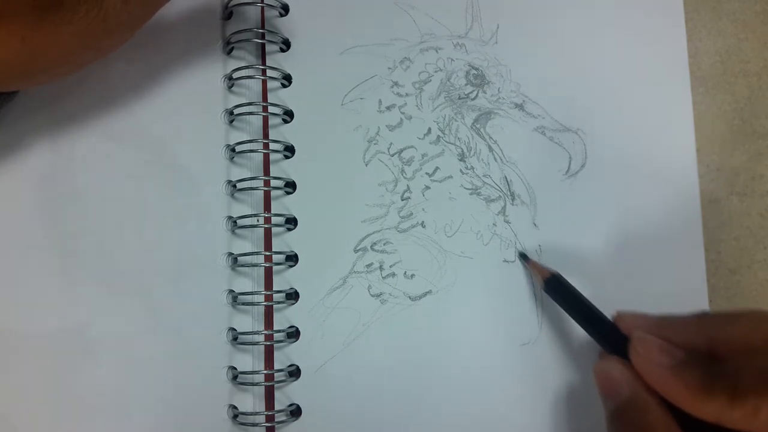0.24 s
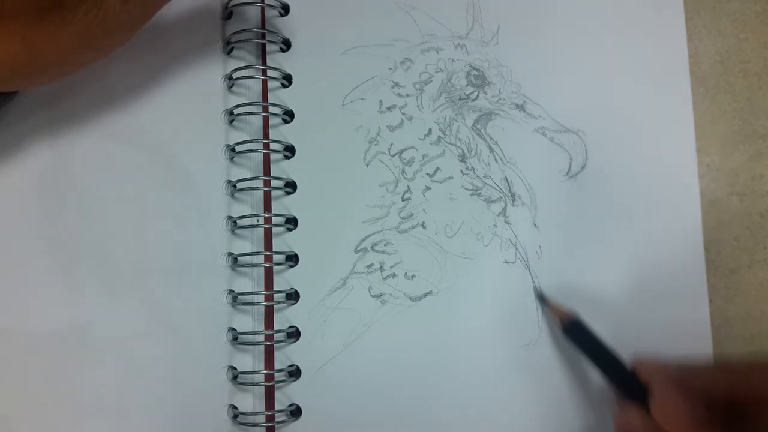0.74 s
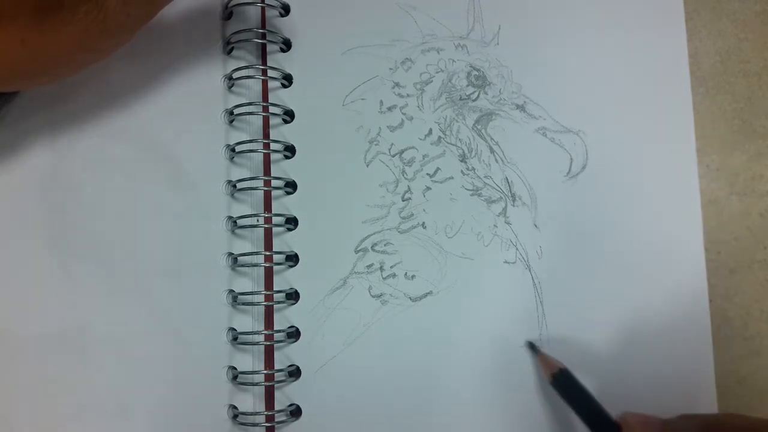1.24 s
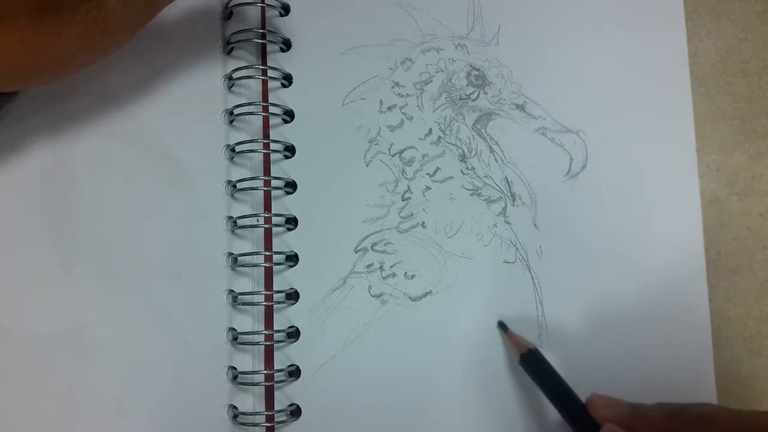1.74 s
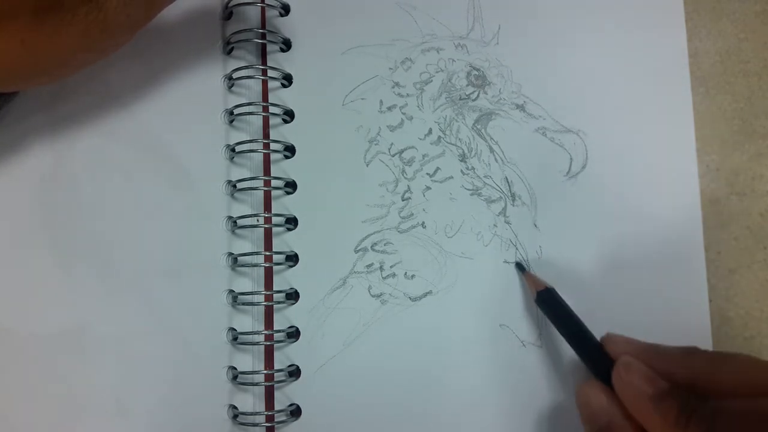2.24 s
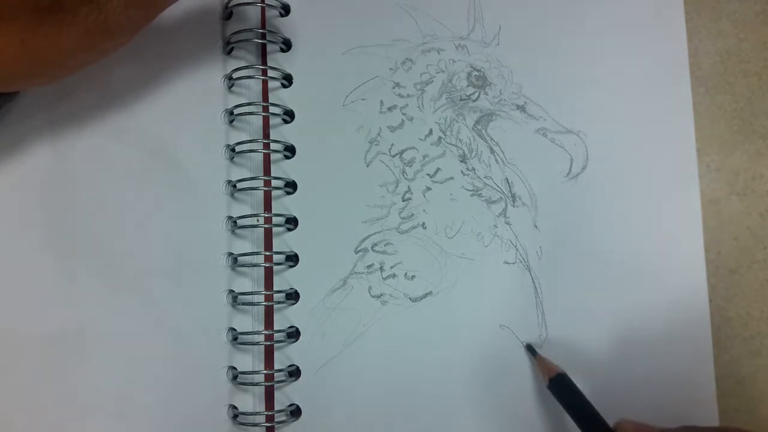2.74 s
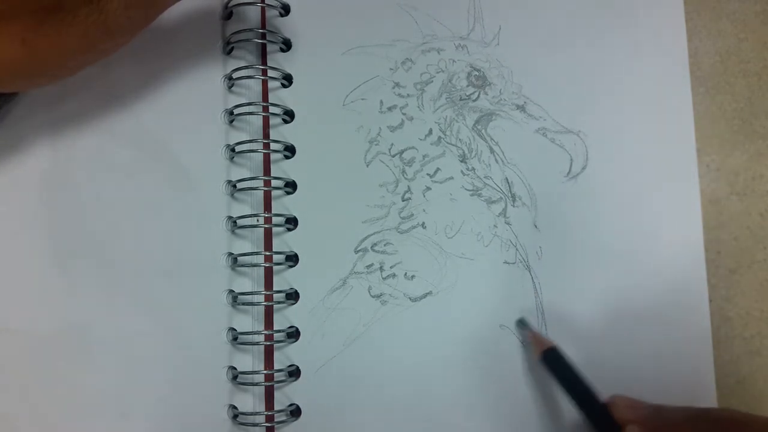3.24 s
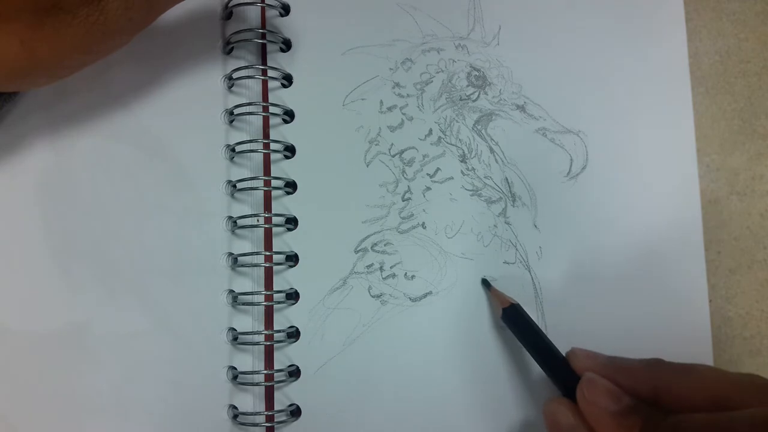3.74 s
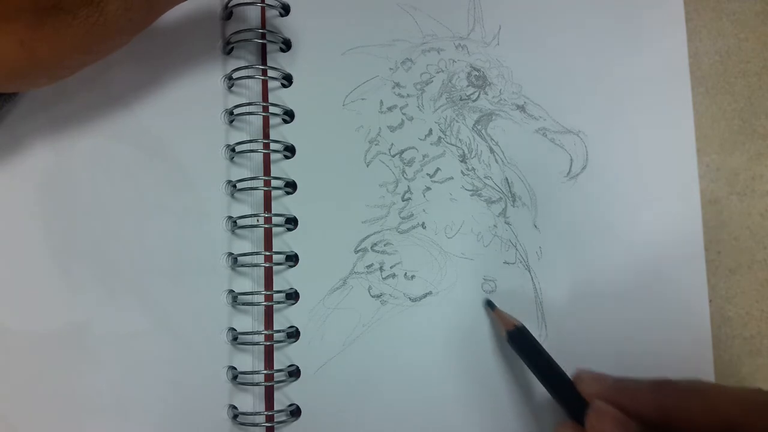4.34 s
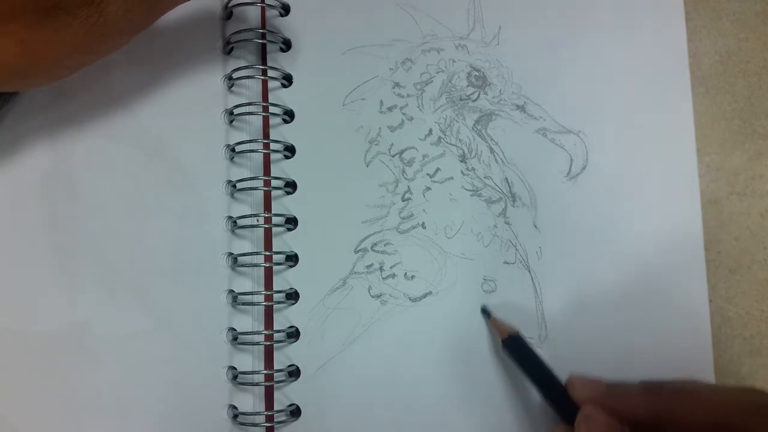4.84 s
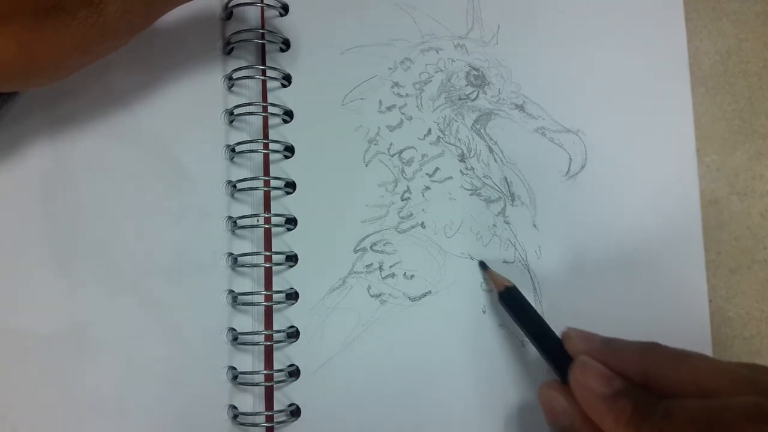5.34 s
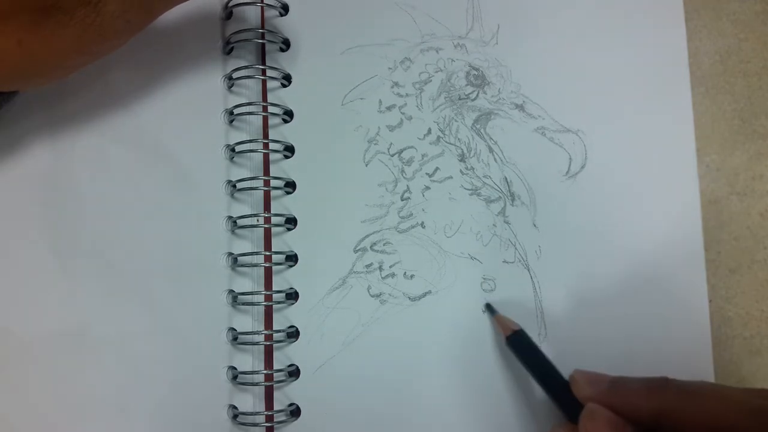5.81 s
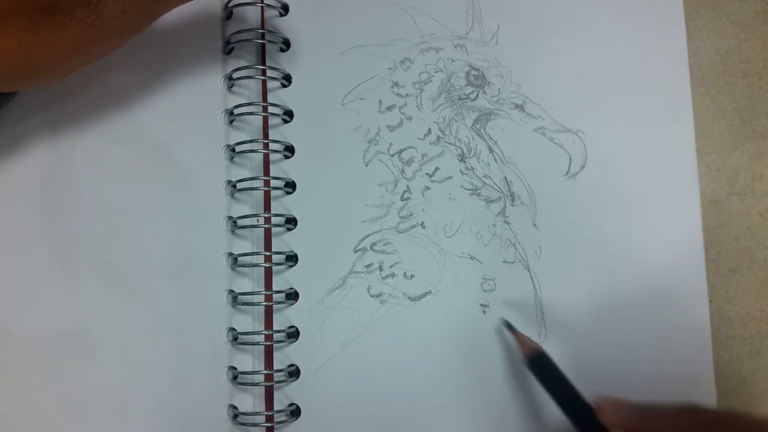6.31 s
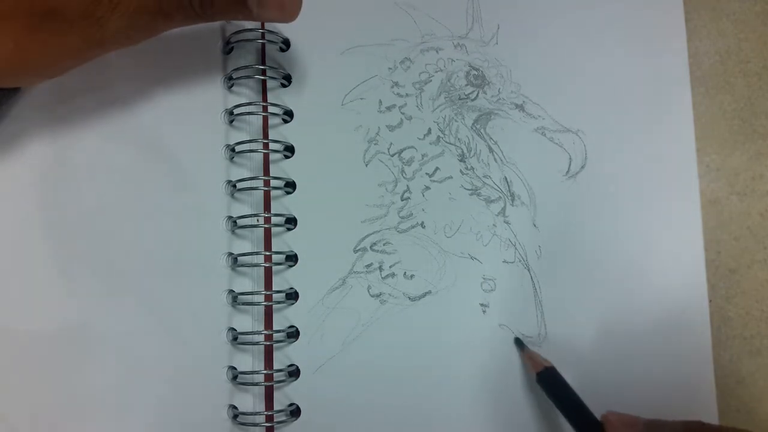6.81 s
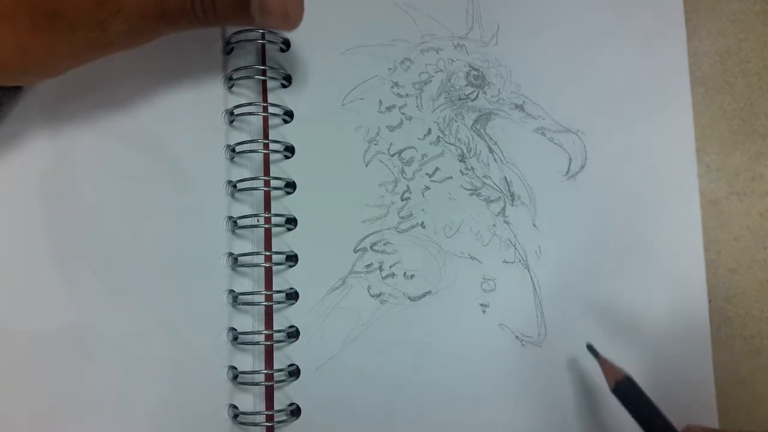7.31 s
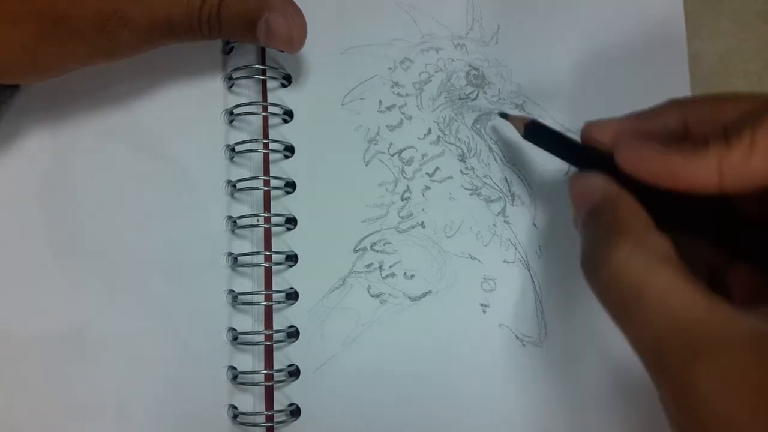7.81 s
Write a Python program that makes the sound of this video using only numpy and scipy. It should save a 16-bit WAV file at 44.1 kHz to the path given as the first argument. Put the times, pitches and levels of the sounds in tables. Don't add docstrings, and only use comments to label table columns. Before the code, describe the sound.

A pencil drags dry, gritty strokes over a spiral pad, the page rumbling dully under the tip. Separate lines give way to fast, light shading dabs, then a brief lull and a few more marks with tiny clicks. The hand slides away with a papery rustle at the end. A motor hums gently with airflow throughout. Close, quiet mono phone pickup indoors, with a very short room tail.

```python
import sys
import numpy as np
from scipy import signal
from scipy.fft import rfft, irfft
from scipy.io import wavfile
from scipy.ndimage import uniform_filter1d

SR = 44100
rng = np.random.default_rng(int(sys.argv[2]) if len(sys.argv) > 2 else 0)


def gain_from_db(level_db):
    decades = np.asarray(level_db, float) / 20
    return 10 ** decades


def pcm_store(signal):
    levels = np.round(np.clip(np.atleast_2d(signal), -1, 1) * 32767)
    wavfile.write(sys.argv[1], SR, levels.astype(np.int16).T)


N = 355840
T = np.arange(N) / SR

# start, fastest moment and end in seconds, hiss in dB, squareness of the speed arch.
DRAWN_LINES = [(-0.005, 0.004, 0.036, -70.9, 2.5), (0.033, 0.109, 0.185, -70.4, 1.6),
               (0.27, 0.367, 0.425, -64.5, 2.3), (0.428, 0.525, 0.626, -68.1, 2.3),
               (0.694, 0.899, 1.008, -49.8, 2.7), (1.036, 1.1, 1.185, -67.5, 2.6),
               (1.172, 1.237, 1.285, -65.5, 3.0), (1.286, 1.349, 1.415, -61.5, 2.4),
               (1.415, 1.444, 1.509, -69.9, 5.6), (1.527, 1.608, 1.691, -58.8, 3.0),
               (1.697, 1.725, 1.783, -69, 5.3), (2.077, 2.144, 2.205, -69.5, 2.1),
               (2.168, 2.185, 2.389, -67.9, 3.5), (2.432, 2.7, 2.84, -59.5, 4),
               (2.52, 2.65, 2.78, -55.3, 1.9), (2.989, 3.026, 3.092, -61.6, 2.2),
               (3.086, 3.139, 3.189, -69.4, 4.6), (3.196, 3.249, 3.312, -60.4, 2.9),
               (3.914, 4.0, 4.059, -64.6, 6), (4.003, 4.108, 4.25, -59.6, 1.4),
               (4.182, 4.246, 4.303, -63.6, 3.9), (4.289, 4.337, 4.389, -63.3, 1.3),
               (6.363, 6.486, 6.563, -65.9, 1.8), (7.94, 8.047, 8.128, -71.7, 1.8)]
# start and end in seconds, hiss in dB.
SHADING_DABS = [(1.79, 1.838, -75), (3.59, 3.613, -69), (3.61, 3.727, -70), (3.753, 3.873, -64.5),
                (4.548, 4.595, -72), (4.612, 4.71, -69), (4.72, 4.783, -68.5), (4.806, 4.883, -73),
                (4.902, 4.987, -71.5), (4.993, 5.118, -69.5), (5.095, 5.13, -67.5), (5.137, 5.222, -68.5),
                (5.23, 5.317, -66.5), (5.331, 5.443, -62), (5.446, 5.527, -63.5), (5.527, 5.595, -70),
                (5.571, 5.704, -74), (5.825, 5.925, -72.9), (5.916, 5.996, -64.5), (6.012, 6.094, -66.5),
                (6.102, 6.176, -63.9), (6.182, 6.262, -70), (6.598, 6.7, -75), (6.68, 6.76, -83),
                (6.92, 7.002, -71), (7.022, 7.095, -63.2), (7.112, 7.161, -73.1), (7.178, 7.206, -69.6),
                (7.218, 7.244, -72), (7.245, 7.277, -73)]
# start in seconds, slant (0 upright, 1 leaning, 2 slanted),
# stretch of the rings as a ratio, brightness in dB per octave, squeak in dB.
GRIPS_ON_SHEET = [(0, .1, .96, -3, -13), (.25, .15, .99, -3, -14), (.65, 0, 1.0, 4, -19),
                  (1.04, .7, 1.02, -.3, -13), (1.28, .3, 1.025, -4, -17), (1.51, .1, 1.001, 3, -14),
                  (1.9, .9, .99, -.3, -12), (2.4, .05, .99, -1.2, -21), (2.9, .55, 1.02, 1.5, -19),
                  (3.4, .5, 1.035, 1.5, -6), (3.9, .1, 1.02, 2.5, -11), (4.45, 1.05, 1.01, -.3, -19),
                  (4.98, .9, .9, -7, -15), (5.1, 1.05, .995, .3, -16), (5.58, 1.7, 1.02, -7, -13),
                  (5.75, 2, .95, 4, -12.5), (6.3, 1.9, 1.03, -6.5, -17), (6.6, 1.9, 1.001, 3, -16),
                  (6.85, 1.95, .995, .3, -14), (7.9, .3, .94, -7, -15)]
# centre in Hz, width in Hz, level in dB.
UPRIGHT_RINGS = [(6400, 3300, -13.5), (9400, 2200, -1), (11000, 1500, -11), (12800, 3400, -4),
                 (14300, 2300, -13), (15600, 2000, -23)]
LEANING_RINGS = [(5900, 2400, -14), (9350, 2100, -1.5), (11400, 2300, -8), (12800, 2000, -14),
                 (14200, 2400, -5.5), (15700, 1800, -17)]
SLANTED_RINGS = [(6500, 2400, -14), (8900, 1900, -3.5), (11300, 2100, -1.5), (12600, 1500, -16),
                 (13900, 2100, -1.5), (15600, 1300, -22)]
# frequency in Hz, level in dB.
PAGE_COLOUR = [(500, 7), (800, 24.5), (1600, 15), (2300, 8.5), (3700, 2), (5000, -10.5), (7000, -25)]
# frequency in Hz, level in dB.
PAD_COLOUR = [(600, -5), (800, 6.5), (1100, -8), (1550, -3.5), (2100, -26)]
# time in seconds, level against the hiss in dB.
PAD_DRUMMING = [(0, -4), (.9, -8.5), (1.35, 5.5), (1.6, 3.5), (2.7, -7.5), (3.1, -1), (3.8, 10), (4.1, 6),
                (4.4, -4), (5.4, 2), (6.0, 6.5), (7.1, -12)]
# frequency in Hz, level in dB.
RUSTLE_COLOUR = [(4000, 4), (5000, 3), (6400, 0.5), (7800, 4.5), (9600, 3), (12000, 2), (14200, 2),
                 (15000, -3), (15700, -6)]
# frequency in Hz, level in dB.
RUB_COLOUR = [(1200, 12.5), (2200, 6.5), (3000, -2), (3800, -0.5), (4600, -9.5), (7000, -10.5)]
# middle in seconds, length in seconds, added rustle and rub in dB.
HAND_SLIDES = [(1.4, 1.7, 0.5, 2.5), (2.4, 0.64, 2, 1.5), (3.05, 1.2, 2.5, 0.5), (3.7, 1.2, 1, 2),
               (4.35, .4, 3, -3.5), (5.106, 0.37, 2, 4.5), (6.2, .4, 2, 1), (6.447, 0.33, .1, 9),
               (6.64, 0.46, 2.5, 5.5), (6.87, 0.54, 2.5, 4.5), (7.437, .22, 3.5, 4.5), (7.6, 0.35, 2, 6),
               (7.833, 0.42, 6.5, 8.5), (8.08, 0.37, 4, 8)]
# frequency in Hz, density in dB per Hz.
AIR_COLOUR = [(18, -18), (53, -2.5), (86, -6), (124, 1.5), (204, -8.5), (265, -4), (329, -9.5), (408, -16),
              (460, -14.5), (835, -12.5), (1250, -23.5), (1700, -28), (2100, -37.5), (3200, -52)]
# centre in Hz, width in Hz, level in
# dB.
DUCT_AND_ROOM_RINGS = [(153.7, 20.6, -65), (235.3, 12, -59), (298.7, 10.9, -56), (565.3, 12.2, -59.5),
                       (465, 29, -68), (658, 30, -75.5), (732.4, 35, -65), (821, 80, -65.5), (875, 92, -64.5),
                       (1024.4, 70, -66), (1121.5, 36, -68.5), (1508, 166, -71.5)]
# centre in Hz, width in Hz, level in dB.
ELECTRONIC_WHINES = [(10900, 30, -94), (12200, 60, -97), (14200, 200, -90), (4000, 120, -94)]
# frequency in Hz, rms level in dB, wavering in dB.
MOTOR_TONES = [(29.78, -67, .3), (30.11, -66, .3), (90.1, -68, 2), (119.95, -62, 2), (180.3, -61, 1),
               (328.6, -67, 2), (537.5, -64, 1.5), (597.2, -57, 1), (1194.6, -71, 1)]
# time in seconds, low tone in dB, blade tone in dB.
ROOM_SWELL = [(0, -52, -47), (.4, -54, -47.5), (.8, -48.5, -51.5), (1.15, -56, -53.5), (1.65, -50, -44.5),
              (1.95, -54, -49.5), (2.45, -56, -55.5), (3.1, -55, -49), (3.6, -55, -50.5),
              (4.05, -58, -44.5), (4.45, -49, -50.5), (5.1, -58, -50), (5.6, -59, -51), (6.1, -51, -46.5),
              (6.45, -63, -47), (7.1, -58, -47), (7.45, -47.5, -51.5), (8.07, -50.5, -47.5)]
# start in seconds, peak in dB, pitch in Hz.
KNOCKS = [(1.934, -56, 2000), (3.589, -58, 6000), (5.101, -53, 2800), (6.8352, -42, 2300),
          (6.8355, -58, 5000), (6.871, -53, 3700), (6.907, -51, 3900), (6.9825, -48, 3600),
          (7.394, -53, 3200), (7.457, -56, 6700), (7.5875, -53, 8300), (7.844, -58, 8000),
          (7.986, -55, 12800), (7.986, -58, 9000)]

DAB_FASTEST, DAB_SQUARE = 0.49, 3.3
PAGE_REL_DB, PAGE_FOLLOWS = -11.8, 0.65
SQUEAK_HZ, SQUEAK_WIDTH_HZ = 7060, 600
RIPPLE_DB, RIPPLE_BINS = 1.4, 5
REST_RUSTLE_DB, REST_RUB_DB = -81.5, -78
AIR_LEVEL_DB = -45
LOW_HZ, BLADE_HZ = 59.72, 298.6
SWELL_TRIM_DB, FLICKER_DB = -2.4, 2.6


def evened(x):
    return x / np.sqrt(np.mean(x ** 2) + 1e-20)


def shaped(x, points):
    f, level_db = np.transpose(points)
    hz = np.fft.rfftfreq(N, 1 / SR)
    gain_db = np.interp(np.log(hz + 1), np.log(f + 1), level_db, -60, -60)
    return irfft(rfft(x) * gain_from_db(gain_db), N)


def band_rms(x, lo_hz, hi_hz):
    return np.sqrt(np.mean(shaped(x, [(lo_hz, 0), (hi_hz, 0)]) ** 2))


def wander(rate):
    knots = rng.standard_normal(int(N / SR * 400) + 2)
    smooth = evened(uniform_filter1d(knots, max(1, round(400 / rate))))
    return np.interp(T * 400, np.arange(len(knots)), smooth)


def stroke_speed():
    hiss, page = np.zeros((2, N))
    dabs = [(a, a + DAB_FASTEST * (b - a), b, db, DAB_SQUARE) for a, b, db in SHADING_DABS]
    for start, top, end, db, square in DRAWN_LINES + dabs:
        span = slice(max(round((2 * start - top) * SR), 0), round((2 * end - top) * SR))
        t = T[span]
        from_top = np.where(t < top, (top - t) / (top - start), (t - top) / (end - top))
        drop_db = 15 * abs(from_top) ** square
        page_db = db + PAGE_REL_DB - (1 - PAGE_FOLLOWS) * (db + 65)
        hiss[span] += gain_from_db(db - drop_db) ** 2
        page[span] += gain_from_db(page_db - 0.7 * drop_db) ** 2
    return np.sqrt(hiss), np.sqrt(page)


def tip_rings(grit):
    out = np.zeros(N)
    postures = np.array([UPRIGHT_RINGS, LEANING_RINGS, SLANTED_RINGS])
    next_grips = GRIPS_ON_SHEET[1:] + [(N / SR,)]
    for (s, slant, stretch, bright_db, squeak_db), (until, *_) in zip(GRIPS_ON_SHEET, next_grips):
        span = slice(round(s * SR), round(until * SR))
        hz = np.fft.rfftfreq(len(grit[span]), 1 / SR)
        share = np.maximum(1 - abs(np.clip(slant, 0, 2) - np.arange(len(postures))), 0)
        squeak = (SQUEAK_HZ / stretch, SQUEAK_WIDTH_HZ, squeak_db)
        rings = [*np.tensordot(share, postures, 1), squeak]
        gain = sum(gain_from_db(db) / (1 + (2 * (hz - f * stretch) / width) ** 2) ** 2 for f, width, db in rings)
        gain *= gain_from_db(bright_db * np.log2(np.maximum(hz / 9500, 1)))
        ripple = evened(uniform_filter1d(rng.standard_normal(512), size=RIPPLE_BINS))
        gain *= gain_from_db(RIPPLE_DB * np.interp(hz, np.linspace(0, SR / 2, len(ripple)), ripple))
        gain *= hz ** 4 / (hz ** 4 + 3500.0 ** 4)
        treble = (hz > 7500) & (hz < 15500)
        loudness = np.sqrt(np.mean(gain ** 2 * treble))
        out[span] = irfft(rfft(grit[span]) * gain, len(grit[span])) / loudness
    return out


def pencil():
    catch_size = gain_from_db(1.35 * np.minimum(rng.exponential(1, N), 3))
    caught = rng.random(N) < 16000 / SR
    grit = catch_size * rng.standard_normal(N) * caught
    grit = evened(grit * gain_from_db(1.0 * wander(300) + 0.5 * wander(40)))
    hiss_gain, page_gain = stroke_speed()
    hiss = gain_from_db(0.07) * hiss_gain * tip_rings(grit)
    page = shaped(grit, PAGE_COLOUR)
    rumble = gain_from_db(2.0) * page_gain * page / band_rms(page, 1840, 4500)
    drum_gain = gain_from_db(np.interp(T, *np.transpose(PAD_DRUMMING))) * hiss_gain
    drum = drum_gain * evened(shaped(grit, PAD_COLOUR))
    return hiss + rumble + drum


def room(x):
    t = np.arange(6000) / SR
    tail = rng.standard_normal(6000) * gain_from_db(-60 * t / 0.14) * (t > 0.002)
    return signal.fftconvolve(x, tail / np.linalg.norm(tail))[:N]


def hand():
    rustle_db, rub_db = np.zeros((2, N))
    for middle, length, added_rustle_db, added_rub_db in HAND_SLIDES:
        slide = np.cos(np.pi * np.clip((T - middle) / length, -0.5, 0.5)) ** 2
        rustle_db += added_rustle_db * slide
        rub_db += added_rub_db * slide
    rustle = shaped(rng.standard_normal(N), RUSTLE_COLOUR)
    rub = shaped(rng.standard_normal(N), RUB_COLOUR)
    rustle *= gain_from_db(REST_RUSTLE_DB + rustle_db + 0.78 * wander(30)) / band_rms(rustle, 8200, 15500)
    rub *= gain_from_db(REST_RUB_DB + rub_db + 1.67 * wander(20)) / band_rms(rub, 2284, 4750)
    return rustle + rub


def resonate(x, hz, width):
    turn = np.exp(2j * np.pi * np.cumsum(hz * np.ones(len(x))) / SR)
    r = np.exp(-np.pi * width / SR)
    return 2 * (turn * signal.lfilter([1 - r], [1, -r], x / turn)).real


def tone(hz, level_db, phase=0.0):
    return np.sqrt(2) * gain_from_db(level_db) * np.sin(2 * np.pi * (hz * T + phase))


def ventilation():
    out = gain_from_db(AIR_LEVEL_DB + 0.5 * wander(3)) * evened(shaped(rng.standard_normal(N), AIR_COLOUR))
    for hz, width, db in DUCT_AND_ROOM_RINGS + ELECTRONIC_WHINES:
        once = resonate(rng.standard_normal(N), hz, width)
        out += gain_from_db(db) * evened(resonate(once, hz, width))
    for hz, db, waver_db in MOTOR_TONES:
        out += tone(hz, db + waver_db * wander(4), rng.random())
    s, low_db, blade_db = np.transpose(ROOM_SWELL)
    for hz, db in ((LOW_HZ, low_db), (BLADE_HZ, blade_db)):
        out += tone(hz, np.interp(T, s, db) + SWELL_TRIM_DB + FLICKER_DB * wander(14))
    return out


def knocks():
    out = np.zeros(N + 600)
    t = np.arange(600) / SR
    for s, db, hz in KNOCKS:
        turns = hz * t
        envelope = gain_from_db(db - 4 * turns) * np.minimum(turns, 1)
        out[round(s * SR):][:600] += envelope * np.sin(2 * np.pi * turns)
    return out[:N]


def scene():
    near = pencil() + knocks()
    wet = gain_from_db(-17) * room(near)
    return (near + wet + hand() + ventilation())[None]


def roll_off(x):
    return signal.sosfilt(signal.butter(12, 15670, fs=SR, output="sos"), x)


def record(dry):
    mix = dry - 0.0007
    return roll_off(mix)


dry = scene()
out = record(dry)
pcm_store(out)
```